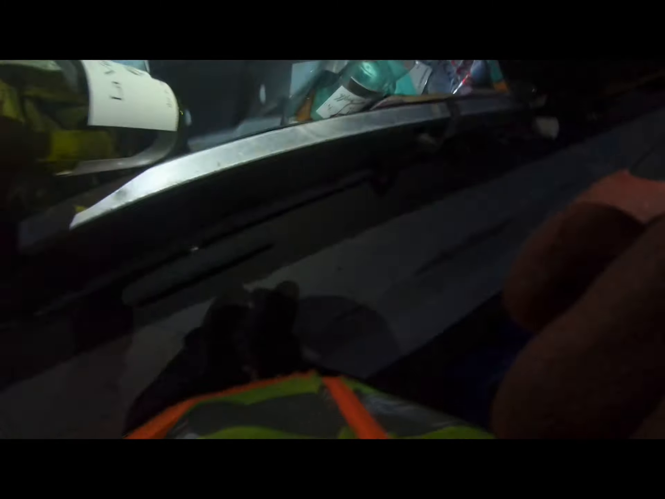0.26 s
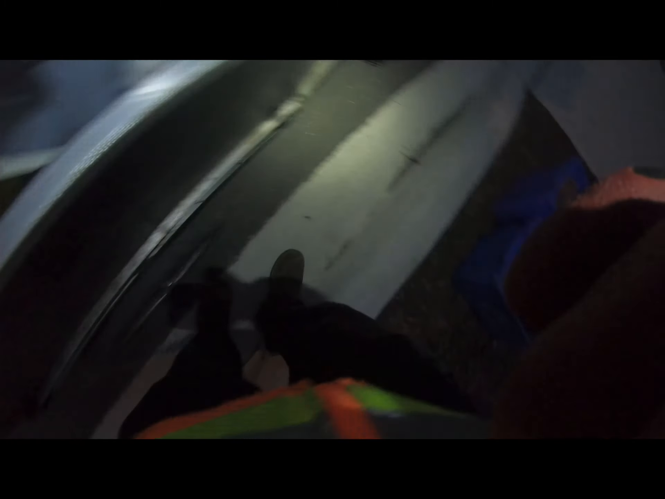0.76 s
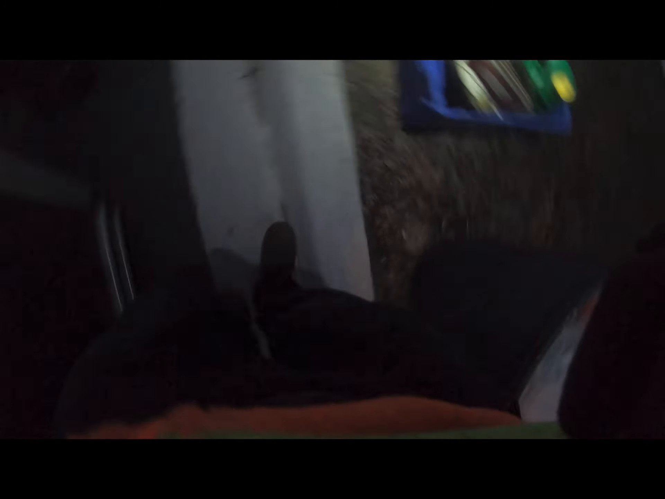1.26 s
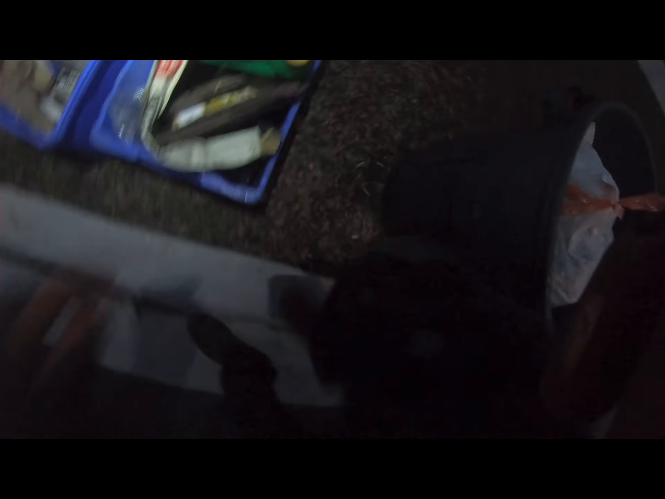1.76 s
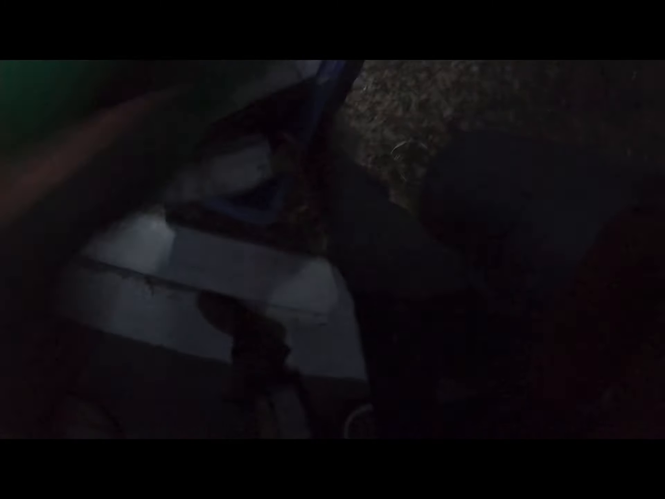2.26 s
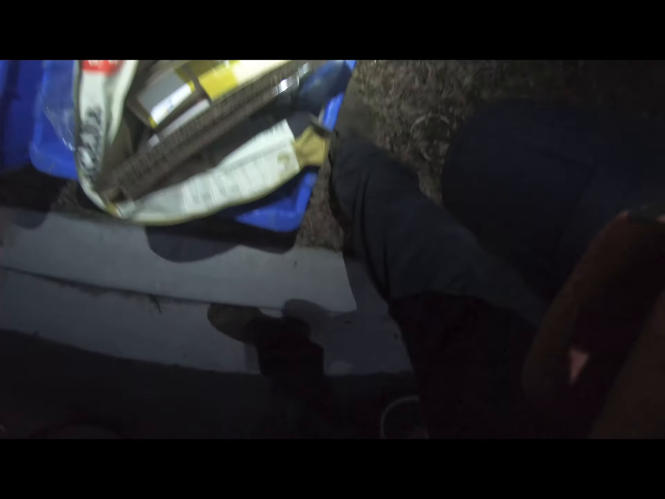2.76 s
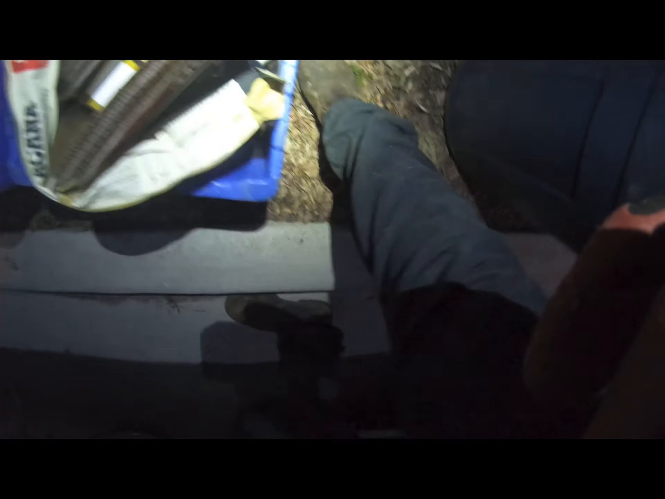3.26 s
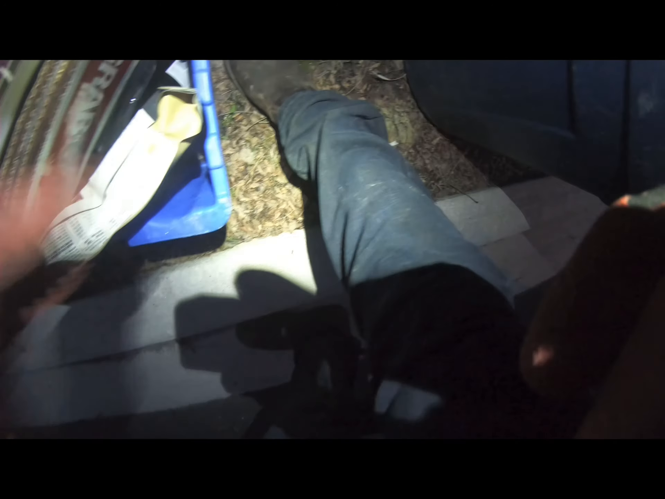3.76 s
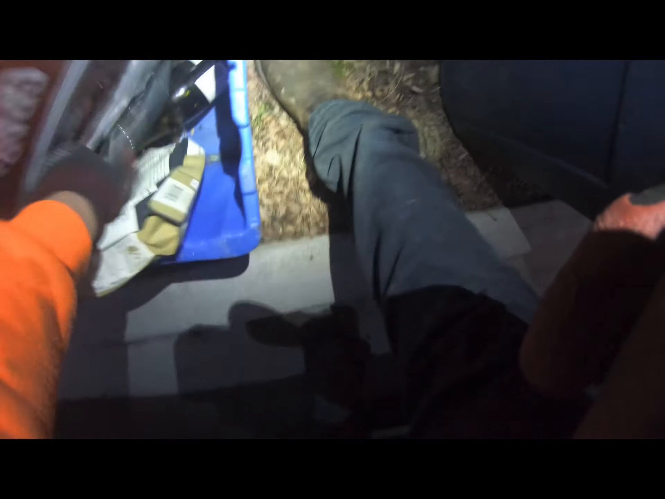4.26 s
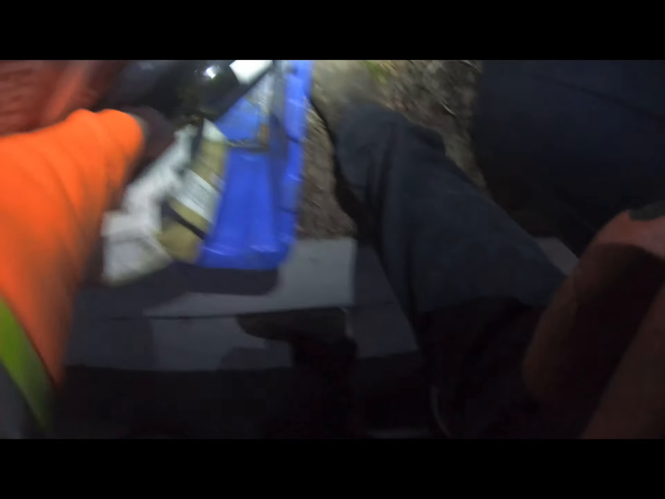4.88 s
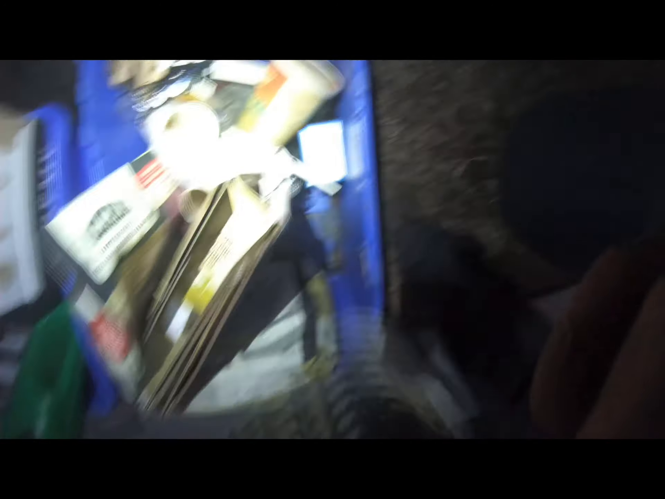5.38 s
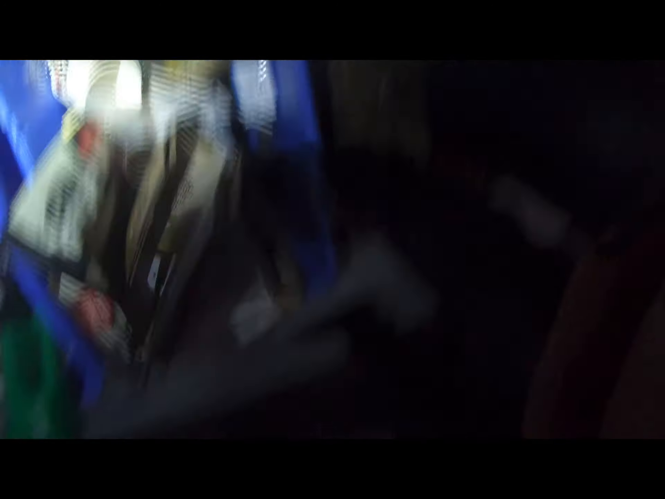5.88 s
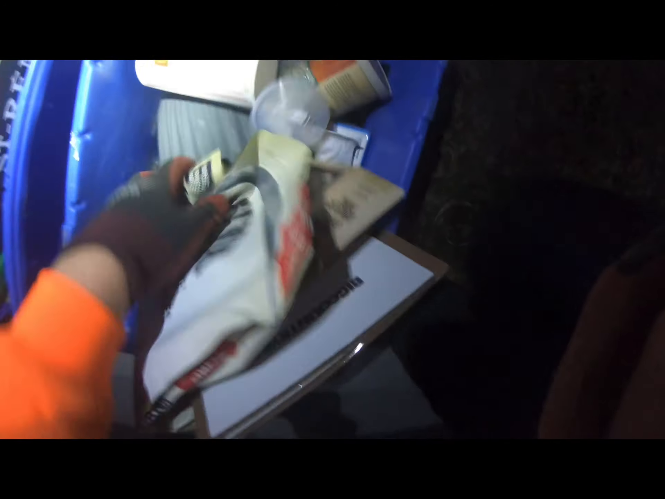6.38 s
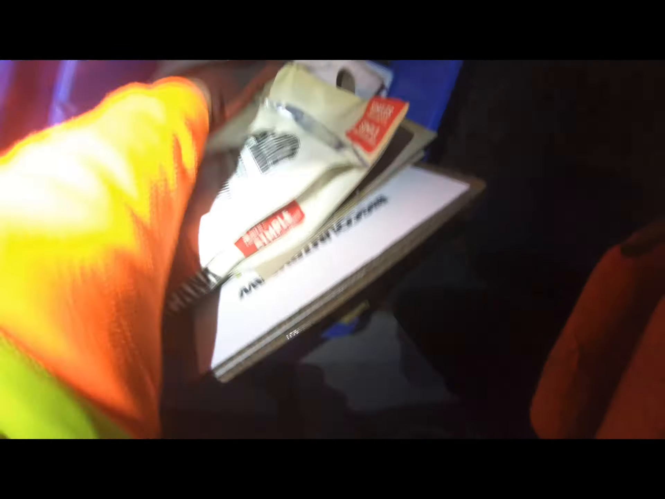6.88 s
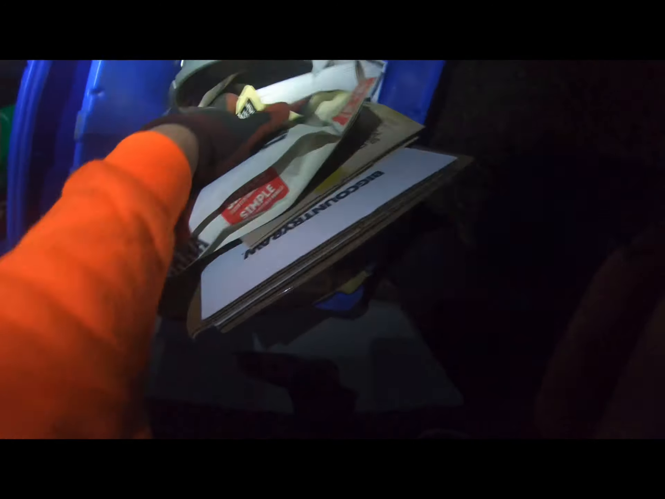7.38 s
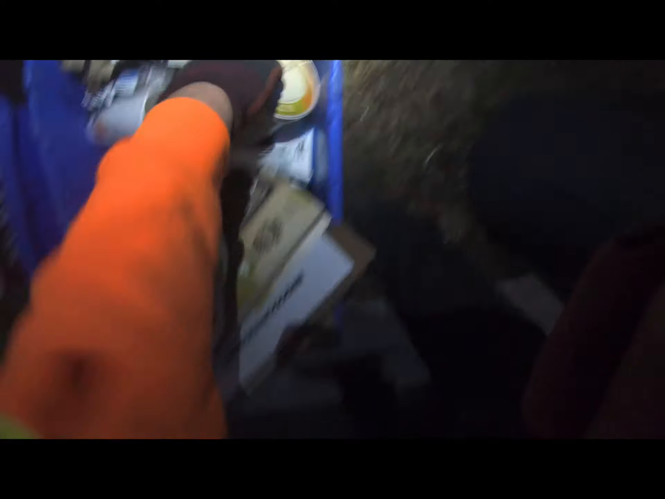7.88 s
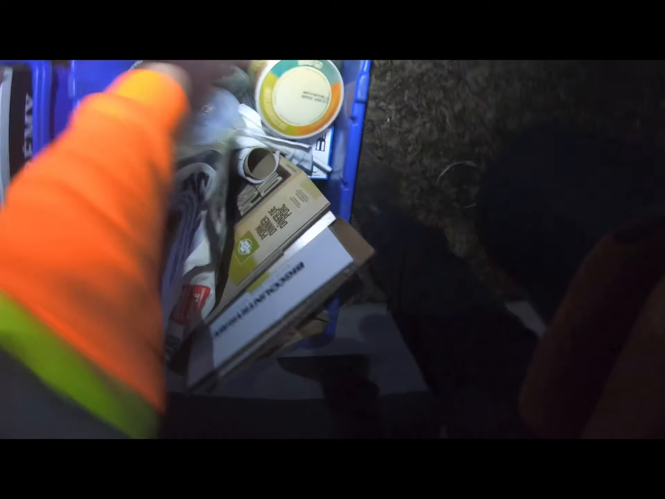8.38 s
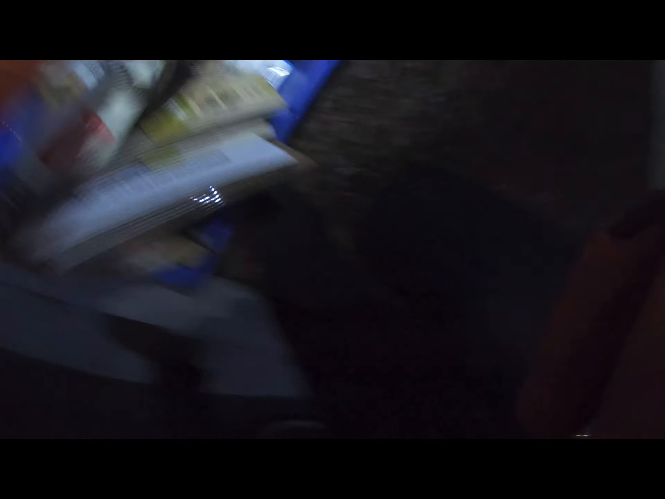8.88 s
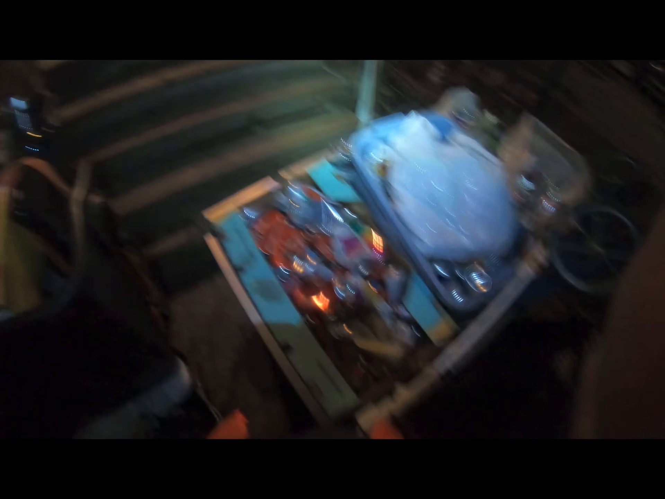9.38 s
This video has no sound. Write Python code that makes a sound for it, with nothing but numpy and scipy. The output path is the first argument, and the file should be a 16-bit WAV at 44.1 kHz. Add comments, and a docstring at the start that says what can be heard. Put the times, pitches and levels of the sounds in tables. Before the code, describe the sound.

Close-up sorting of empties at a kerb: an opening crash, dull plastic bin knocks, then crackly bag pulls and sharp uneven container clatter.

```python
"""Cans, bottles and bags crash, knock and crinkle close to a body-worn microphone as recycling is sorted at a kerb:
a load crashes into a truck, then bags of empties are pulled about in plastic bins. Container walls buckle and ring
as noise through resonances, bin walls boom as decaying sines, bags crinkle as runs of tiny snaps, and rubbing walls
squeak as gliding tones. Clothing and the low noise of the street are shaped noise; the loudest blows are clipped."""
import sys
import numpy as np
from scipy import signal
from scipy.fft import rfft, irfft
from scipy.io import wavfile
from scipy.ndimage import map_coordinates

SR = 44100
rng = np.random.default_rng(int(sys.argv[2]) if len(sys.argv) > 2 else 0)


def generate_wav(sig):
    """Save sig (samples, or channels by samples) to the path in sys.argv[1] as 16-bit PCM at SR."""
    pcm = np.round(np.clip(np.atleast_2d(sig).T, -1, 1) * 32767).astype(np.int16)
    wavfile.write(sys.argv[1], SR, pcm)


N = 425124
END_S = 8.997  # the recorder stops here
HZ = np.fft.rfftfreq(2048, 1 / SR)  # frequency grid of the colouring filters

# relative spectrum of sharp edges and thin film: frequency_hz, density_db
EDGE_SPECTRUM = [(2000, -32.5), (4000, 2), (5000, 2), (6000, -3), (7000, -1.5), (8200, -3), (9600, -14),
                 (11000, -27.5), (15000, -46)]
# relative spectrum of a bin wall's vibration: frequency_hz, density_db
WALL_SPECTRUM = [(40, -24), (100, -6), (155, 2.5), (210, 2), (300, -8), (420, -16.5), (1000, -81.5),
                 (6000, -100)]
# relative spectrum of cardboard and contents scraping: frequency_hz, density_db
SCRAPE_SPECTRUM = [(150, -24), (330, -3), (500, -0.5), (760, -3), (1000, -11.5), (2500, -37.5),
                   (12000, -90.5)]
# what the hand is moving: time_s, crispness (0 = smooth rubbing of card and sleeve, 1 = a bag full of cans)
CRISPNESS_POINTS = [(0.0, 0.28), (2.0, 0.28), (3.85, 0.39), (4.0, 0.53), (5.3, 0.69), (5.5, 0.25),
                    (6.0, 0.51), (6.2, 0.42), (6.9, 0.7), (7.12, 0.31), (7.5, 0.46), (7.8, 0.44),
                    (8.5, 0.42), (9.0, 0.61)]
# pulls on a bag: start_s, length_s, crinkle_db, film_db (thin film hiss)
BAG_PULLS = [(0.21, .04, -18, -35.5), (0.25, 0.028, -11.5, -30.5), (0.43, 0.1, -39, -36.5),
             (0.62, 0.19, -46, -46.5), (0.735, 0.13, -30, -35), (0.92, 0.073, -24.5, -35),
             (1.5, 0.027, -24, -27), (1.7, 0.53, -41, -53), (2.02, 0.32, -28, -40.5),
             (2.13, 0.04, -20, -32.5), (2.7, 2.03, -34, -47), (2.88, 0.048, -24, -40),
             (3.005, 0.03, -22.5, -37), (3.375, 0.043, -24.5, -37), (3.57, 0.24, -37.5, -47),
             (3.92, 0.3, -19, -29.5), (4.22, 0.15, -19, -32), (4.33, 0.22, -16, -31),
             (4.6, 0.15, -18.5, -35.5), (4.772, 0.025, -17, -30), (4.865, 0.18, -17.5, -31),
             (5.03, 0.32, -27.5, -38.5), (5.66, 0.14, -34, -42.5), (6.035, .08, -20, -35),
             (6.155, 0.56, -16.5, -30), (6.72, .15, -22, -34.5), (7.0, 0.44, -26.5, -38.5),
             (7.1, 0.057, -24.5, -56), (7.49, 0.078, -21.5, -37.5), (7.7, 0.27, -29, -45.5),
             (7.805, 0.29, -23, -33), (8.11, 0.19, -31, -42), (8.28, 0.39, -25, -36.5),
             (8.385, 0.2, -16, -25.5), (8.76, 0.075, -22.5, -33), (8.9, 0.15, -31, -43)]
PULL_ATTACK_S, PULL_RELEASE_S = 0.0087, 0.26  # the film tightens fast, then settles by 60 dB


def clacks():
    """Buckling and modal ringing: a wall creaks under load, cracks, rattles on a main mode and touches again."""
    # containers knocking and buckling: time_s, level_db, ring_hz, edge_db, rebound_db (relative to level_db)
    knocks = [(0.213, -5, 1570, -16.5, -9), (0.255, -0.5, 1120, -5, -3.5), (0.43, -5.5, 1580, -19, 2),
              (1.508, -11, 3637, -7, -9), (1.56, -12, 4510, -4, -16), (1.635, -12, 1470, -15.5, -10),
              (2.157, -9, 1080, -20, -15), (2.71, -4.5, 2590, -21, -7), (2.888, -5.5, 1210, -21.5, -2.5),
              (3.818, -10, 1560, -19, -14), (3.839, -11.5, 1400, -21.5, -15), (3.916, -12.5, 1410, -13, -4),
              (4.033, -7, 1560, -17.5, -9), (4.05, -4, 1493, -12, -16), (4.069, -6, 1165, -14, -10),
              (4.106, -2.5, 1590, -20, 1.5), (4.152, -1.5, 1704, -17, -14.5), (4.181, -2.5, 1493, -15, -18),
              (4.213, -9, 1043, -19.5, -11.5), (4.26, -8, 1044, -24, -11), (4.298, -7, 906, -27, -9.5),
              (4.384, -8, 1370, -3, -8.5), (4.409, 1.5, 1564, -13.5, -4.5), (4.44, -7, 850, -11, -16),
              (4.57, -6, 1123, -22.5, -19), (4.598, -1, 2004, -16, -16), (4.73, -8.5, 1260, -31, -10),
              (4.77, -6, 1164, -17.5, -17), (4.781, -5.5, 1214, -17.5, -10), (4.794, -3.5, 604, -11, -15),
              (4.865, -4, 1320, -19, -16), (4.894, -9.5, 537, -28.5, -10), (4.966, -2.5, 1167, -20, -1.5),
              (4.986, -9, 1230, -10, -6.5), (5.159, -6, 1734, -27, -18), (5.177, -2.5, 1590, -15, -6.5),
              (5.198, -3.5, 1333, -29, -11), (5.265, -10.5, 1690, -28, -16), (5.298, -7.5, 1178, -18.5, -8),
              (6.179, -7.5, 1032, -26, -18), (6.221, -2.5, 970, -10, -4), (6.237, -3, 2360, -18.5, -9.5),
              (6.341, -6, 712, -31.5, -3), (6.503, -4.5, 1260, -23.5, -9.5), (6.636, -5.5, 1660, -16, -6),
              (6.664, -3, 986, -25, -13.5), (6.68, -5, 1515, -9, -20), (6.736, -3.5, 976, -8, -15.5),
              (6.789, -5.5, 1128, -11.5, -18.5), (6.839, -10.5, 802, -31, -15),
              (6.864, -12, 1013, -29.5, -18.5), (6.914, -6.5, 1240, -5, -22),
              (6.956, -7.5, 1187, -22, -9.5), (6.996, -0.5, 872, -14.5, 2), (7.055, -4.5, 1483, -33.5, -18),
              (7.207, -9.5, 1620, -32.5, -14), (7.295, -3, 1320, -16, -3.5), (7.405, -13, 1840, -30, -18),
              (7.505, -11, 980, -26.5, -4.5), (7.564, -14.5, 1440, -12, -10), (7.622, -8.5, 1275, -16, -17),
              (7.674, -19.5, 969, -32.5, -6), (8.577, -3, 2267, -19, -17), (8.744, -9.5, 917, -7, -3)]
    t60_s = 0.037  # thin walls die quickly
    lead_in_s, lead_in_db = 0.014, -12.5  # the creak just before the snap
    rebound_s = 0.008  # delay of the second touch
    out, t = np.zeros(N), np.arange(SR // 10) / SR
    rise = 1 - np.exp(-t / 0.0013)
    snap = rise * fade(t, t60_s * 0.42)
    ringing = rise * fade(t, t60_s * 1.6)
    loading = np.minimum(t / lead_in_s, 1) ** 2 * fade(np.maximum(t - lead_in_s, 0), t60_s)
    for s, db, hz, edge_db, rebound_db in knocks:
        body = container(hz, edge_db, ring_db=3, uneven_db=3.5)
        # the longer rattle has a weaker edge and a stronger main mode
        rattling_body = container(hz, edge_db - 6, ring_db=12, uneven_db=5)
        crack = amp(3) * burst(snap, body)
        rattle = amp(-7) * burst(ringing, rattling_body)
        dent = amp(-6) * rise * fade(t, t60_s) * np.sin(2 * np.pi * hz * t)
        add(out, s - lead_in_s, amp(db + lead_in_db) * burst(loading, body))
        add(out, s, amp(db) * (crack + rattle + dent))
        add(out, s + rebound_s, amp(db + rebound_db) * burst(snap, body))
    return out


def container(hz, edge_db, ring_db=9, quality=6, uneven_db=4.5, spacing_hz=200):
    """Modal response: a main wall resonance among many weaker ones that differ from blow to blow."""
    # relative spectrum of a container's wall: frequency_hz, density_db
    body_spectrum = [(100, -34.5), (400, -5), (900, 6.5), (1600, 5.5), (2300, 1.5), (3500, 0), (4800, -11),
                     (6000, -23.5), (10000, -56), (13000, -65)]
    detuning = 2 * quality * (HZ - hz) / hz
    main_mode = amp(ring_db) / np.sqrt(1 + detuning ** 2)
    others = map_coordinates(rng.standard_normal(len(HZ)), [HZ / spacing_hz])
    body = gains(body_spectrum) * np.hypot(1, main_mode)
    edge = amp(edge_db + 5) * gains(EDGE_SPECTRUM)
    return response((body + edge) * amp(uneven_db * others))


def scrunches():
    """Progressive buckling: a wall that gives way gradually swells and dies with a rough, uneven level."""
    # short scrunches of plastic and card: time_s, peak_db, ring_hz, edge_db, swell_s (time to the envelope's peak)
    crushes = [(0.143, -20, 4480, 11.5, 0.008), (0.235, -7.5, 4270, -6, 0.0085),
               (0.736, -9.5, 754, -10, 0.014), (0.916, -24, 3400, -29, .018), (1.125, -27.5, 5000, 0, .006),
               (1.208, -30, 5000, 2, 0.0037), (2.166, -8, 5200, 0, .012), (2.208, -10, 750, -41, 0.0054),
               (3.243, -17.5, 600, -35, 0.0092), (3.829, -10, 520, -16.5, 0.01),
               (3.935, -5, 4340, -1.5, 0.014), (4.329, -4, 1068, -3, 0.02), (5.056, -5.5, 535, -31, 0.018),
               (6.035, -10, 994, -8, 0.0043), (6.075, -3, 1650, -1.5, 0.015), (6.535, -3, 687, -24, 0.0096),
               (7.247, -13, 1480, -21, 0.0059), (7.453, -11, 1360, -33, 0.016),
               (7.843, -1.5, 660, -10, 0.012), (8.008, -10, 2004, 6, 0.0069),
               (8.048, 0.5, 900, -27, 0.0022), (8.27, -5.5, 753, -38.5, 0.0038),
               (8.327, -4, 790, -11, 0.007), (8.508, -3.5, 2390, -0.5, 0.013)]
    out, t = np.zeros(N), np.arange(SR // 5) / SR
    for s, db, hz, edge_db, swell in crushes:
        roughness = amp(2.7 * wobble(500, len(t)))
        envelope = t ** 2 * np.exp(-2 * t / swell)
        body = container(hz, edge_db, ring_db=15.5, quality=3, uneven_db=2.5)
        add(out, s, amp(db) * burst(envelope * roughness, body))
    return out


def jostle(count=440):
    """Random small impacts in the bag, as strong as the bag is moved and its load is crisp."""
    out, t = np.zeros(N), np.arange(SR // 40) / SR
    crinkle_db, film_db = strokes(BAG_PULLS, PULL_ATTACK_S, PULL_RELEASE_S)
    crisp, = curves(CRISPNESS_POINTS)
    times = (np.arange(count) + rng.random(count)) * END_S / count
    for s, (size, pitch, life) in zip(times, rng.standard_normal((count, 3))):
        at = int(s * SR)
        db = crinkle_db[at] + 10.5 + 2 * min(size, 1.5)
        edge_db = film_db[at] - crinkle_db[at] - 8
        body = container(1800 * np.exp(0.6 * pitch), edge_db, ring_db=11)
        envelope = t * fade(t, 0.011 * np.exp(0.4 * life))
        add(out, s, crisp[at] * amp(db) * burst(envelope, body))
    return out


def bumps():
    """Panel resonance: a soft heavy blow excites the bin's wall mode, with a shudder and a slower-rising knock."""
    # hollow blows on the bins: time_s, level_db, boom_hz, knock_db (relative to level_db)
    blows = [(0.26, -1, 148, -6.5), (0.284, -5, 201, -6.5), (0.33, -3, 166, -23.5),
             (0.426, -11.5, 212, -8.5), (0.965, -1, 201, -14), (1.825, -11, 100, -13.5),
             (2.019, -3, 162, -30.5), (2.057, -6, 71, -31), (2.312, 4.5, 157, -21), (2.586, -4, 197, -28),
             (2.71, 1.5, 215, -20), (2.787, -11, 230, -24), (2.89, -4.5, 287, -19), (3.018, -6, 149, -15.5),
             (3.049, -1.5, 151, -27), (3.253, -0.5, 160, -19), (3.406, -1, 200, -33), (3.836, 2, 180, -12),
             (5.17, -12, 128, -12.5), (5.538, -4.5, 71, -20), (5.609, -12, 139, -21),
             (6.162, 1, 154, -24.5), (6.341, -3, 120, -8.5), (6.406, -12.5, 73, -1.5),
             (6.557, -11, 200, 5.5), (7.374, -5, 157, -15), (7.855, -4.5, 171, -4.5),
             (7.871, -4, 178, -0.5), (8.041, -17.5, 362, 7), (8.326, -1, 189, -2.5), (8.474, -6.5, 174, 0),
             (8.525, 1, 237, -7.5), (8.575, -4.5, 219, -10), (8.747, -10.5, 281, -3),
             (8.798, -2, 157.4, -6), (8.819, -3, 136, -7), (8.953, -5, 175, -15)]
    out, t = np.zeros(N), np.arange(SR // 3) / SR
    wall, scrape = response(gains(WALL_SPECTRUM)), response(gains(SCRAPE_SPECTRUM))
    rise = 1 - np.exp(-t / 0.004)
    for s, db, hz, knock_db in blows:
        boom = amp(-0.5) * rise * fade(t, 0.094) * np.sin(2 * np.pi * hz * t)
        shudder = amp(-5.5) * burst(rise * fade(t, 0.12), wall)
        knock = amp(knock_db + 3) * burst(t * fade(t, 0.06), scrape)  # the contents, just after
        add(out, s, amp(db) * (boom + shudder + knock))
    return out


def bags():
    """Crackling noise: smooth rubbing breaks into snapping creases with crispness; contents and film share them."""
    # relative spectrum of crinkling contents: frequency_hz, density_db
    crinkle_spectrum = [(200, -13), (600, -1.5), (1100, 4.5), (1500, 1), (2000, -3), (2500, 0),
                        (3500, -4.5), (4700, -6.5), (5800, -30), (10000, -45), (13000, -62)]
    crinkle_db, film_db = strokes(BAG_PULLS, PULL_ATTACK_S, PULL_RELEASE_S)
    crisp = np.clip(curves(CRISPNESS_POINTS)[0], 0, 1)
    snaps = creases(rate=600, spread_db=4.5, life=0.011)
    unsteadiness = amp(3.13 * wobble(60))
    grip = np.sqrt(1 - crisp + crisp * snaps ** 2) * unsteadiness
    crinkle = amp(crinkle_db - 3.5) * noise(crinkle_spectrum, grip)
    film = amp(film_db - 2) * noise(EDGE_SPECTRUM, grip)
    return crinkle + film


def bins():
    """Stick-slip friction: sliding loads catch and slip, drumming on the bin walls."""
    # shoves of a load along a bin: start_s, length_s, boom_db (wall), scrape_db (cardboard)
    shoves = [(0.235, .06, -14.5, -15.5), (0.33, 0.12, -23, -29.5), (0.72, 0.24, -32.5, -29),
              (1.1, 0.18, -27, -41), (1.5, 0.18, -41, -31.5), (1.93, 0.36, -25.5, -31.5),
              (2.55, .24, -20.5, -46.5), (2.9, 0.17, -21.5, -42), (3.2, 0.27, -20.5, -48),
              (3.76, 0.56, -19.5, -31.5), (4.35, 0.4, -27.5, -29.5), (4.83, 0.21, -21.5, -27),
              (5.16, 0.091, -27.5, -32), (5.53, 0.12, -33, -38), (6.02, 0.71, -20.5, -27),
              (6.8, 0.23, -26, -29), (7.29, 0.081, -21.5, -37), (7.48, 0.16, -30, -32),
              (7.82, 0.057, -19, -20), (8.02, 0.13, -23.5, -23), (8.26, 0.4, -19, -21),
              (8.77, 0.16, -20.5, -24.5)]
    # the load gets going, then comes to rest by 60 dB
    boom_db, scrape_db = strokes(shoves, attack_s=0.047, release_s=0.49)
    slips = creases(rate=160, spread_db=3.5, life=0.042)
    boom = amp(boom_db) * noise(WALL_SPECTRUM, slips)
    scrape = amp(scrape_db - 2) * noise(SCRAPE_SPECTRUM, slips)
    return boom + scrape


def slide():
    """Friction-driven plate resonance: the tipped load scrapes over sheet metal, which sings near 3 kHz."""
    # the load sliding on in the truck after the crash: start_s, length_s, level_db
    slips = [(0.27, 0.032, -31.5), (0.44, .08, -32.5), (0.55, 0.34, -42.5), (0.88, 0.1, -37)]
    # relative spectrum of the sheet metal: frequency_hz, density_db
    chute_spectrum = [(300, -54), (1200, -28.5), (2600, -21), (2790, 3.5), (2970, -6.5), (3100, -9),
                      (3250, 1), (3700, -14), (4430, -17.5), (5200, -25.5), (13000, -70)]
    # each slip starts softly and dies by 60 dB
    db, = strokes(slips, attack_s=0.03, release_s=0.22, rest_db=-90)
    return amp(db + 3.4 * wobble(27)) * noise(chute_spectrum)


def squeak():
    """Stick-slip oscillation: rough, gliding tones and their octaves swell and fade with the stroke."""
    # bottles and bin walls rubbing: start_s, length_s, first_hz, last_hz, level_db, octave_db (relative to the tone)
    rubs = [(0.905, .07, 2850, 2750, -33, -24), (0.92, .08, 3520, 3470, -30, -25),
            (0.905, .07, 2150, 1960, -28.5, -25), (2.32, .045, 452, 701, -16.5, -25),
            (2.46, .06, 650, 876, -36, -20), (4.46, 0.13, 1220, 1137, -18.5, -4)]
    jitter = 0.032  # unsteadiness of the slipping rate, as a share of the pitch
    out = np.zeros(N)
    for s, length, first_hz, last_hz, db, octave_db in rubs:
        progress = np.linspace(0, 1, int(length * SR))
        glide = first_hz + (last_hz - first_hz) * progress
        hz = glide * (1 + jitter * wobble(600, len(progress)))
        phase = 2 * np.pi * np.cumsum(hz) / SR
        roughness = amp(2.7 * wobble(120, len(progress)))
        swell = 2 * np.sqrt(progress * (1 - progress)) * roughness
        tone = np.sin(phase) + amp(octave_db) * np.sin(2 * phase)
        add(out, s, swell * amp(db) * tone)
    return out


def clinks():
    """Free modal decay: two light touches on glass or metal that is free to ring."""
    # one free mode a row: time_s, pitch_hz, level_db, t60_s
    modes = [(5.531, 5809, -37, 0.1), (5.531, 8210, -32, 0.091), (5.531, 10510, -48, .13),
             (5.73, 2800, -21, 0.062)]
    out, t = np.zeros(N), np.arange(SR // 2) / SR
    rise = 1 - np.exp(-t / 0.00074)
    for s, hz, db, t60 in modes:
        add(out, s, amp(db) * rise * fade(t, t60) * np.sin(2 * np.pi * hz * t))
    return out


def background():
    """Broadband noise shaped by spectrum: clothing thuds on the microphone over the steady street."""
    # clothing tugging at the microphone: start_s, length_s, level_db
    tugs = [(0.0, 0.29, -24.5), (0.97, .26, -20), (1.65, 0.34, -31), (1.94, 0.99, -22), (3.25, 0.14, -21.5),
            (3.75, .8, -24.5), (4.78, .29, -24.5), (5.22, 0.057, -23), (5.51, 0.1, -16), (6.0, 0.99, -20),
            (6.39, .03, -14), (7.28, 0.11, -19), (8.07, 0.87, -31)]
    # relative spectrum of the clothing: frequency_hz, density_db
    cloth_spectrum = [(12, -19), (28, 0), (60, 4), (95, 1.5), (150, -7.5), (400, -74.5), (3000, -100)]
    # relative spectrum of the street: frequency_hz, density_db
    street_spectrum = [(20, 9), (45, 3), (150, 1), (300, -9), (450, -17), (1050, -10), (1500, -12),
                       (2200, -20), (4700, -34.5), (5600, -53), (8200, -45.5), (10000, -52.5), (12000, -84)]
    # the cloth tightens, then slackens by 60 dB
    tug_db, = strokes(tugs, attack_s=0.02, release_s=0.523)
    clothing = amp(tug_db + 0.14) * noise(cloth_spectrum)
    street = amp(-28.5) * noise(street_spectrum)
    return clothing + street


def echo(x):
    """Diffuse reflection: a short answer from the truck and the ground, with its own decay at each frequency."""
    # decay of the echo: frequency_hz, t60_s
    decay_times = [(150, 0.57), (1500, 0.29), (4000, 0.061), (10000, 0.3)]
    hz, t, z = signal.stft(rng.standard_normal(SR // 2), SR, nperseg=256)
    decay = np.exp(-np.log(1000) * t / along(decay_times, hz)[:, None])
    tail = signal.istft(z * decay, SR, nperseg=256)[1]
    delayed = np.pad(tail, (SR // 200, 0))  # 5 ms later
    return colour(x, delayed / np.linalg.norm(tail))


def strokes(rows, attack_s, release_s, rest_db=-56):
    """Power addition: movements rise, hold and die to a resting level; one dB curve for each level column."""
    t = np.arange(N) / SR
    power = np.full((len(rows[0]) - 2, N), amp(rest_db) ** 2)
    for start, length, *levels in rows:
        span = slice(max(int(start * SR), 0), int((start + length + release_s) * SR))
        age = t[span] - start
        shape = np.clip(age / attack_s, 0, 1) * fade(np.maximum(age - length, 0), release_s)
        power[:, span] += np.outer(amp(levels), shape) ** 2
    return 10 * np.log10(power)


def creases(rate, spread_db, life):
    """Shot noise: envelope, of rms 1, of random tiny snaps of uneven size, each dying by 60 dB in life seconds."""
    sizes = amp(spread_db * np.minimum(rng.standard_exponential(N), np.pi))
    snaps = (rng.random(N) < rate / SR) * sizes
    decay = fade(np.arange(SR // 20) / SR, life / 2)  # of power, hence half the life
    power = np.abs(colour(snaps ** 2, decay))
    return unit(np.sqrt(power))


def noise(spectrum, envelope=1):
    """Source-filter principle: white noise under an envelope, coloured, of rms 1."""
    return unit(colour(rng.standard_normal(N) * envelope, response(gains(spectrum))))


def burst(envelope, h):
    """Source-filter principle: a coloured puff of noise with peak 1."""
    x = colour(rng.standard_normal(len(envelope)) * envelope, h)
    return x / np.abs(x).max()


def response(gain):
    """Minimum phase: the causal impulse response, scaled to energy 1, shaped by these gains on the HZ grid."""
    cepstrum = irfft(np.log(gain + 1e-6))
    half = len(cepstrum) // 2
    # folding the cepstrum onto positive times makes the response causal
    cepstrum[1:half] *= 2
    cepstrum[half + 1:] = 0
    h = irfft(np.exp(rfft(cepstrum)))
    return h / np.linalg.norm(h)


def colour(x, h):
    """Linear filtering: x convolved with an impulse response."""
    convolve = signal.oaconvolve if len(x) > SR else signal.fftconvolve
    return convolve(x, h)[:len(x)]


def gains(spectrum):
    """Decibel conversion: a (Hz, dB) spectrum as gains on the HZ grid."""
    return amp(along(spectrum, HZ))


def along(points, hz):
    """Logarithmic frequency scale: (Hz, value) points interpolated on a log axis."""
    f, v = np.transpose(points)
    return np.interp(np.log(hz + 1), np.log(f + 1), v)


def curves(rows):
    """Linear interpolation: one value per sample for each column after the time."""
    s, *cols = np.transpose(rows)
    return [np.interp(np.arange(N) / SR, s, c) for c in cols]


def wobble(rate, size=N):
    """Band-limited fluctuation: a smooth random curve, rate knots a second."""
    knots = rng.standard_normal(int(size * rate / SR) + 4)
    return map_coordinates(knots, [np.arange(size) * rate / SR])


def fade(t, t60):
    """Exponential free decay: 60 dB in t60 seconds."""
    return np.exp(-np.log(1000) * t / max(t60, 1e-3))


def amp(db):
    """Decibel definition: level to amplitude ratio."""
    return 10 ** (np.asarray(db) / 20)


def unit(x):
    """Root-mean-square normalisation: x at rms 1."""
    return x / np.sqrt(np.mean(x ** 2) + 1e-20)


def add(track, s, sound):
    """Superposition: mix a sound in at time s."""
    start = max(round(s * SR), 0)
    track[start:start + len(sound)] += sound[:N - start]


def scene():
    """Superposition: the hits with their echo, over the bags, bins, slide, clinks and background."""
    hits = clacks() + scrunches() + jostle() + bumps() + squeak()
    handling = bags() + bins() + slide() + clinks()
    return (hits + amp(-12) * echo(hits) + handling + background())[None]


def record(dry):
    """Clipping and band limiting: the recorder overloads at full scale, stops abruptly and drops the top treble."""
    top_hz = 15850
    running = np.clip((END_S - np.arange(N) / SR) / 0.003, 0, 1)  # stops within 3 ms
    passed = np.fft.rfftfreq(N, 1 / SR) < top_hz
    return irfft(rfft(np.clip(dry, -1, 1) * running) * passed, N)


dry = scene()
out = record(dry)
generate_wav(out)
```